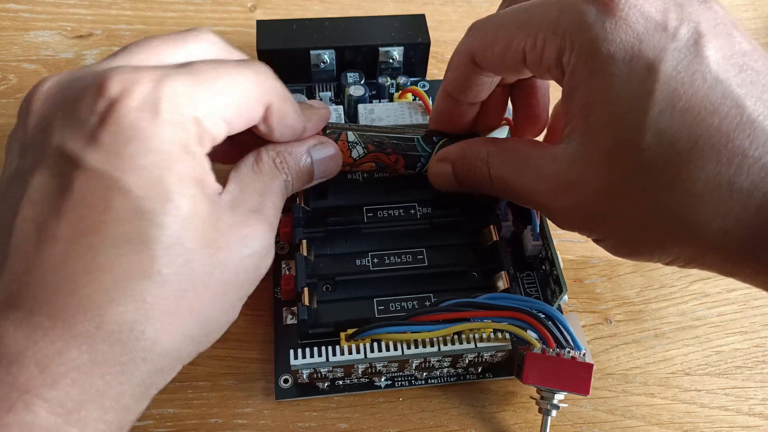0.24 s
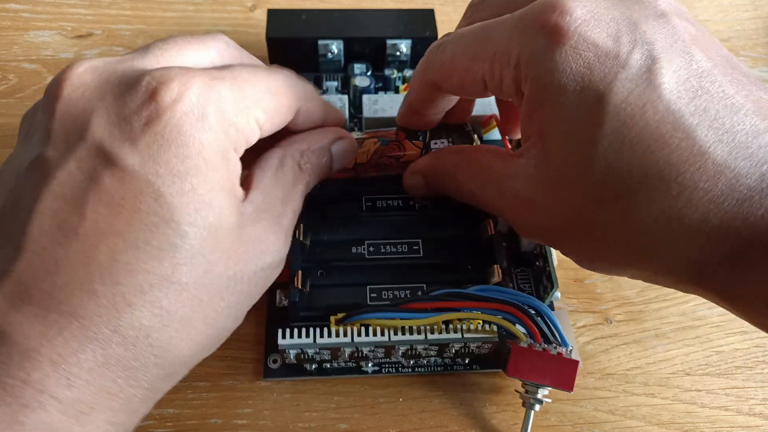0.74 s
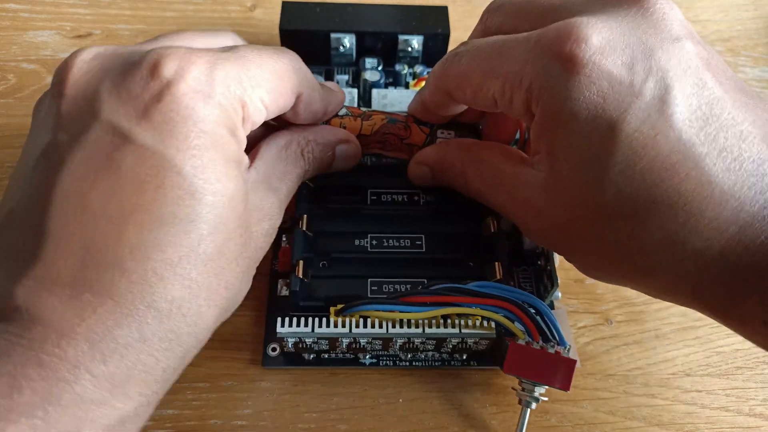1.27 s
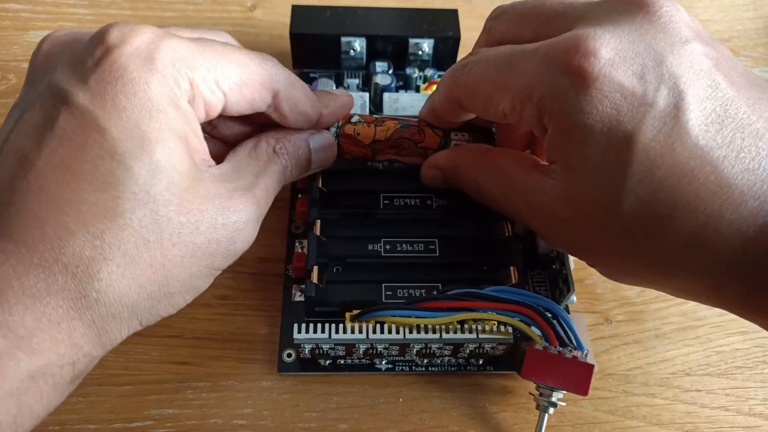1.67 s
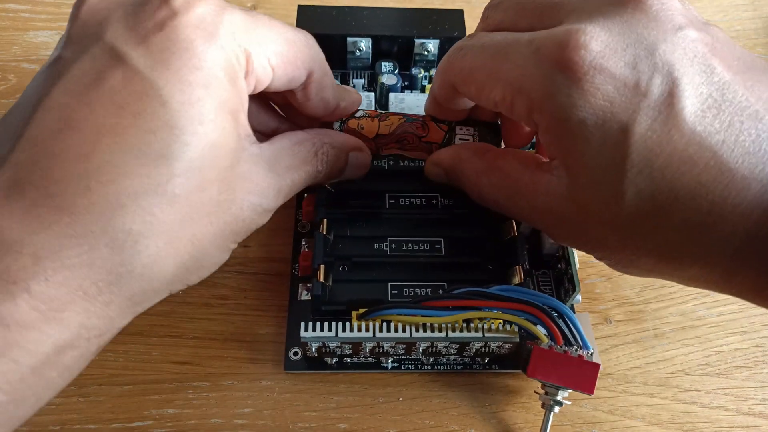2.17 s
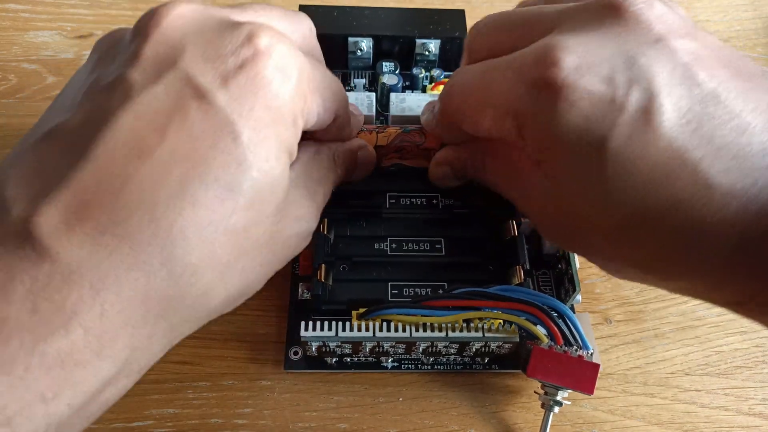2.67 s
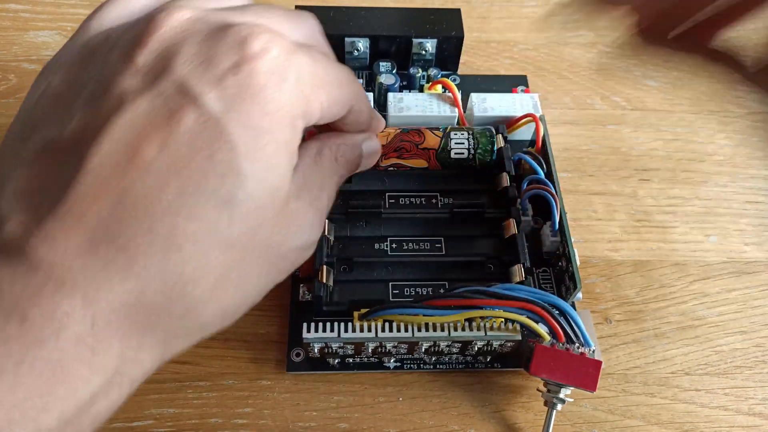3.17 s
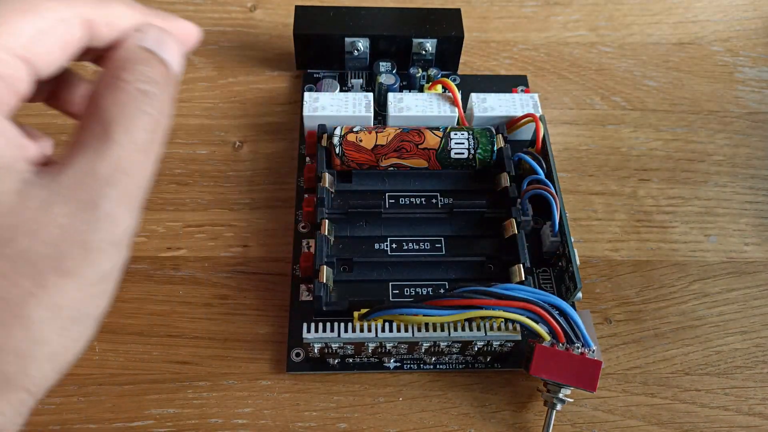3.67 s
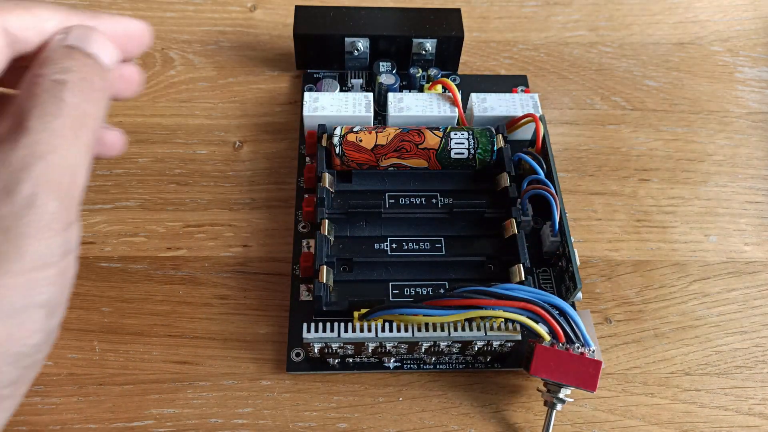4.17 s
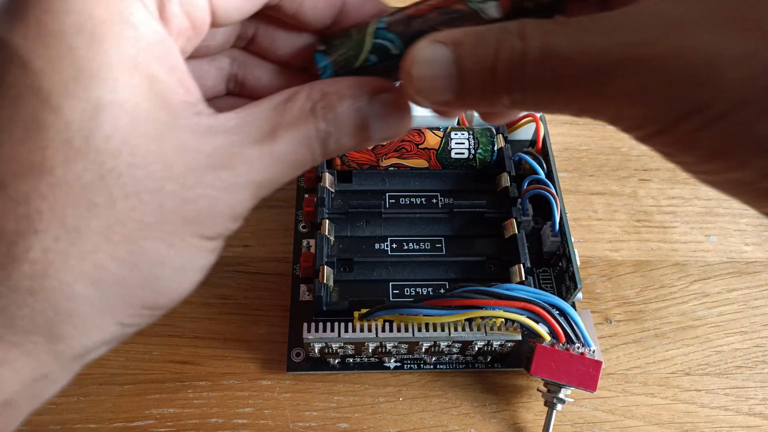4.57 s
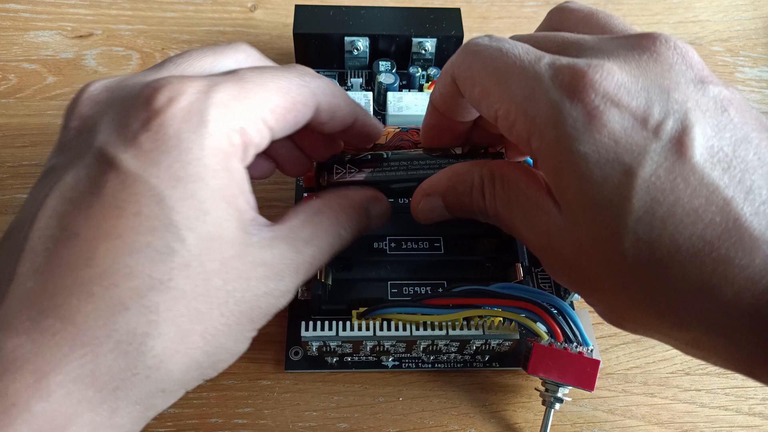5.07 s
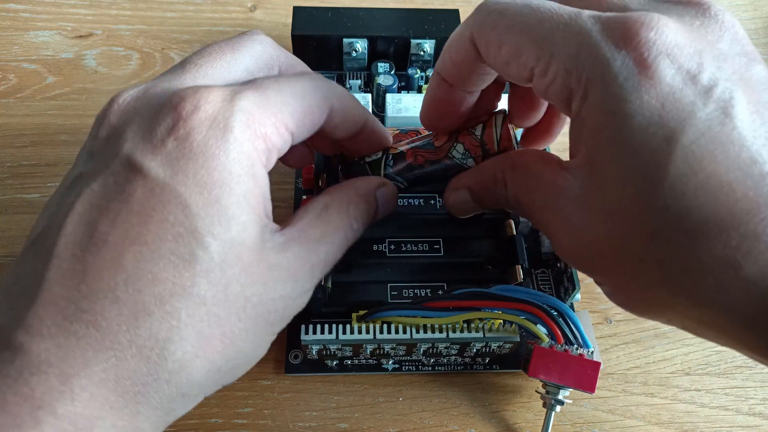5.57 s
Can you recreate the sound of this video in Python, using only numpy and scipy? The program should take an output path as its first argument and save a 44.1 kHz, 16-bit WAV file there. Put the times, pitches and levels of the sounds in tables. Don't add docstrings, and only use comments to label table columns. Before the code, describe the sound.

Close phone pickup of cells being seated in a plastic holder indoors. An initial click with a table thump leads to faint rubbing, dry ticks and soft bumps. Two violent cracks overload the microphone near the middle. Then come sparse bright spring pings, near quiet, a cluster of medium clicks and a last soft push, with little high treble.

```python
import sys
import numpy as np
from scipy import signal
from scipy.fft import rfft, irfft, next_fast_len
from scipy.io import wavfile
from scipy.ndimage import map_coordinates

SR = 44100
rng = np.random.default_rng(int(sys.argv[2]) if len(sys.argv) > 2 else 0)


def to_wav(s):
    ch = np.atleast_2d(s).T
    pcm = np.round(np.clip(ch, -1, 1) * 32767)
    wavfile.write(sys.argv[1], SR, pcm.astype(np.int16))


def ratio_of_db(decibels):
    return 10 ** (np.asarray(decibels, float) / 20)


N = 257103

# f/Hz, width/Hz, level/dB
TABLE_MODES = [(153.2, 14.8, -1), (188.3, 6.7, 3), (231, 24.2, -2), (345, 9.6, -6)]
BOARD_MODES = [(380, 30, -2.5), (424.7, 27, -2), (530, 43, -1.5), (616, 17, -16), (695.5, 72, 3.5),
               (826, 75, -7.5), (877, 33, -10), (1110, 11, 1), (1181, 14, -0.5)]
HOLDER_MODES = [(1340, 2200, -6.5), (2040, 960, -2), (2700, 232, -3), (3200, 170, -4.5), (3596, 395, -6.5),
                (4360, 690, -8.5)]
SPRING_MODES = [(5620, 990, -6), (6388, 503, 5.5), (6364, 707, 7), (7130, 4400, -7.5)]
# t/s, level/dB, deep mode level/dB, favoured f/Hz, ring time factor
CELL_BLOWS = [
    (.275, -9.5, -4.5, 286, 0.51),
    (1.303, -22, -5, 190, 0.54),
    (2.24, -1, -4.5, 223, 0.27),
    (2.621, 4, -16, 189, 0.6),
    (4.108, -24, -10, 268, 0.25),
    (4.608, -23, -4, 210, 0.38),
    (4.615, -23, -10.5, 191.7, 0.41),
    (5.705, -18, -11, 192.8, 1.73),
]


def unit(x):
    return x / np.sqrt(np.mean(x ** 2) + 1e-20)


def along(points, hz):
    f, v = np.transpose(points)
    return np.interp(np.log(hz + 1), np.log(f + 1), v)


def filtered(x, response):
    m = next_fast_len(x.shape[-1] + SR // 8)
    spectrum = rfft(x, m) * response(np.fft.rfftfreq(m, 1 / SR))
    return irfft(spectrum, m)[..., :x.shape[-1]]


def body(modes):
    def response(f):
        total = 0
        for k, (centre, width, db) in enumerate(modes):
            damping = 1j * f * width
            total = total + (-1) ** k * ratio_of_db(db) * damping / (centre * centre - f * f + damping)
        return total
    return response


def lay(track, s, sound):
    track[round(s * SR):][:len(sound)] += sound


def grit(rate, spike_db):
    slips_now = rng.random(N) < rate / SR
    return slips_now * ratio_of_db(spike_db * rng.exponential(size=N)) * rng.standard_normal(N)


def room_tone():
    # f/Hz, level/dB per Hz
    air_shape = [(180, -46), (300, 0.5), (400, -9), (557, -4), (764, -9), (852, -7), (1420, -14.5),
                 (2780, -12.5), (3560, -15), (4880, -23.5), (5910, -20.5), (8000, -28), (10400, -62),
                 (17600, -120)]
    # f/Hz, level/dB per Hz
    rumble_shape = [(15, -43.5), (30, -2), (60, 0.5), (130, -1), (160, -19), (260, -5), (310, -44.5)]
    # f/Hz, level/dB rms
    machines = [(90, -56.5), (96, -54), (119, -69), (220.7, -65)]
    air, rumble = [unit(filtered(rng.standard_normal(N), lambda hz: ratio_of_db(along(shape, hz))))
                   for shape in (air_shape, rumble_shape)]
    t = np.arange(N) / SR - 3.835
    sway = map_coordinates(rng.standard_normal(40), [np.arange(N) / N * 30])
    hum = sum(np.sqrt(2) * ratio_of_db(db + 1.8 * sway) * np.cos(2 * np.pi * hz * t) for hz, db in machines)
    return ratio_of_db(-56) * air + ratio_of_db(-54) * rumble + hum


def shake(db, t60):
    t = np.arange(N) / SR
    return sum(ratio_of_db(db + blow_db - 60 * (t - s).clip(0) / t60) * (t > s) for s, blow_db, *_ in CELL_BLOWS)


def hands():
    # t/s, sliding level/dB, pressure level/dB
    hand_motion = [(0, -57, -41.5), (0.163, -43, -50.5), (.39, -44.5, -32.5), (.52, -51.5, -44.5),
                   (.9, -56.5, -49), (1.33, -51.5, -42.5), (1.5, -61, -43.5), (2.1, -57, -51.5),
                   (2.419, -49.5, -45), (2.58, -59.5, -50), (2.94, -66, -79), (3.26, -53.5, -57),
                   (3.52, -70, -63.5), (4.3, -56, -72.5), (4.82, -65, -49), (5.081, -48.5, -49.5),
                   (5.25, -75, -62.5), (5.751, -55.5, -51.5)]
    # level/dB under the blow, t60/s
    rattles = [
        (-46, .55),
        (-45.5, 0.45),
        (-34, 0.3),
        (-19, 0.17),
    ]
    s, *columns = np.transpose(hand_motion)
    slide_db, press_db = [np.interp(np.arange(N) / SR, s, column) for column in columns]
    creak_db = 0.46 * slide_db + 0.54 * press_db - 3
    drives = slide_db, slide_db - 13, creak_db, press_db
    rub, hiss, creak, tremor = [ratio_of_db(db) + shake(*after) for db, after in zip(drives, rattles)]

    slide = grit(rate=6000, spike_db=2.0)
    creaking = grit(rate=2700, spike_db=2.5)
    trembling = grit(rate=920, spike_db=0.5)
    out = unit(filtered(slide, body(HOLDER_MODES))) * rub
    out += unit(filtered(slide, body(SPRING_MODES))) * hiss
    out += unit(filtered(creaking, lambda f: body(BOARD_MODES)(f) / f.clip(400))) * creak
    return out + unit(filtered(trembling, lambda f: body(TABLE_MODES)(f) ** 2)) * tremor


def scrapes():
    # start t/s, length/s, level/dB, centre f/Hz, brightness/dB
    short_slides = [(0.26, 0.032, -27, 1480, -16), (0.336, 0.19, -43.5, 3240, -36),
                    (0.509, 0.088, -47, 2300, -26), (0.678, 0.035, -49, 2950, -18),
                    (0.738, 0.1, -48, 3200, -14), (0.922, 0.025, -50, 2980, -7),
                    (1.163, 0.11, -44.5, 3300, -17), (1.37, 0.18, -55, 2700, -25),
                    (1.547, 0.028, -48.5, 2260, -15), (1.66, 0.095, -50.5, 2280, -19),
                    (1.853, 0.12, -55.5, 2650, -19), (2.507, 0.05, -44.5, 2700, -10),
                    (3.132, 0.096, -55, 3700, -1), (3.28, 0.097, -49, 3830, -25),
                    (3.522, 0.063, -55, 2980, -4), (4.154, 0.28, -54.5, 3770, -1.5),
                    (4.709, 0.1, -47.5, 2700, -11), (4.982, 0.15, -53.5, 2900, -16),
                    (5.087, 0.034, -35.5, 3200, -22.5), (0, 0.11, -50.5, 1900, -7),
                    (5.469, 0.19, -57.5, 2700, -17), (5.648, 0.051, -45, 2600, -21),
                    (5.71, 0.064, -48, 3200, -29), (4.312, 0.4, -65.5, 4300, 3)]
    out, slide = np.zeros(N), grit(rate=7000, spike_db=1.5)
    for s, length, db, hz, bright_db in short_slides:
        piece = slide[round(s * SR):][:round(length * SR)]
        swell = np.sin(np.pi * np.linspace(0, 1, len(piece)) ** 0.69) ** 4
        spot = body([(hz, 0.5 * hz, 0)])
        dull = unit(filtered(piece, lambda f: body(HOLDER_MODES)(f) * spot(f)))
        bright = unit(filtered(piece, body(SPRING_MODES)))
        lay(out, s, ratio_of_db(db) * swell * (dull + ratio_of_db(bright_db) * bright))
    return out


def singing():
    # start t/s, length/s, level/dB, f/Hz
    squeaks = [(0, 0.14, -52.5, 2000), (.335, 0.043, -54, 2650), (0.36, 0.085, -46, 3600),
               (0.392, 0.074, -48.5, 2660), (1.172, 0.074, -44, 2800), (1.189, .045, -40.5, 1955),
               (1.175, 0.066, -53, 5770), (1.309, .05, -51.5, 2740), (1.39, 0.075, -54, 2700),
               (2.397, 0.052, -46.5, 2700), (3.138, 0.033, -44, 3880), (3.137, .03, -50.5, 5900),
               (3.166, 0.038, -52, 6000), (3.169, .03, -52, 7000), (3.155, 0.055, -58, 2500),
               (5.66, 0.041, -48, 2700), (5.714, .04, -47, 2700), (1.885, .09, -38, 190),
               (1.985, .05, -40, 190), (5.735, .065, -33, 190), (2.64, .04, -19, 190),
               (2.76, .04, -40, 190), (1.935, .03, -49, 550), (2.155, .045, -43, 550),
               (2.14, .05, -50, 720), (3.83, .065, -59, 2400), (3.83, .065, -66, 4000),
               (4.04, .07, -65, 3700), (4.63, .05, -50, 6200), (4.725, .05, -57, 6800),
               (4.73, .04, -51, 2600), (4.75, .03, -53, 4300), (5.176, .035, -59, 7200),
               (5.72, .035, -54, 4300), (2.48, .07, -48, 680)]
    # t/s, level/dB, f/Hz, t60/s
    buzzes = [
        (2.25, -24, 2600, 0.32),
        (2.25, -30, 1205, 0.22),
        (2.25, -33, 1970, 0.3),
        (2.63, -30.5, 1735, .3),
        (2.63, -32, 3810, 0.36),
        (2.63, -32, 3000, 0.23),
        (2.63, -27.5, 889, 0.28),
        (3.305, -48, 5980, .15),
        (3.305, -47, 3560, 0.21),
    ]
    out, slide, t = np.zeros(N + SR), grit(rate=4400, spike_db=3.0), np.arange(SR // 3) / SR
    shapes = [(s, hz, ratio_of_db(db) * np.sin(np.pi * (t / length).clip(0, 1)) ** 1.4)
              for s, length, db, hz in squeaks]
    shapes += [(s, hz, ratio_of_db(db - 60 * t / t60) * (1 - np.exp(-t / .004))) for s, db, hz, t60 in buzzes]
    for s, hz, shape in shapes:
        piece = slide[rng.integers(N - len(t)):][:len(t)]
        part = body([(hz, 0.09 * hz, 0)])
        lay(out, s, shape * unit(filtered(piece, lambda f: part(f) ** 2)))
    return out[:N]


def ringing():
    # start t/s, length/s, peak level/dB, f/Hz
    rocking_notes = [(2.715, .085, -23, 195), (2.255, .085, -19, 240), (2.3, .06, -37, 545),
                     (2.37, .035, -29, 230), (2.42, .055, -30, 190), (2.68, .06, -29, 420),
                     (2.73, .06, -35, 590), (2.64, .035, -19, 275), (.272, .026, -14, 135),
                     (.352, .055, -27, 215), (.4, .07, -33, 185), (.4, .045, -40, 730),
                     (.255, .035, -35, 1280), (.188, .028, -41, 1150), (.445, .025, -42, 650),
                     (1.9, .045, -30, 190), (5.71, .025, -32, 370), (5.742, .02, -30, 380),
                     (5.785, .035, -43, 650), (5.668, .035, -48, 2750), (.018, .035, -50, 1950),
                     (4.715, .045, -52, 2700), (4.755, .022, -53, 2050), (3.787, .018, -50, 600),
                     (3.74, .018, -50, 600), (1.268, .035, -37, 190), (2.175, .025, -40, 540),
                     (1.755, .03, -38, 140), (4.617, .024, -18.5, 190), (4.732, .045, -37, 215),
                     (4.672, .018, -38, 1400), (4.963, .025, -46, 350), (5.05, .022, -46, 350),
                     (5.107, .028, -46, 490), (2.621, .025, -15, 300), (2.24, .022, -19, 1500),
                     (1.028, .018, -42, 600)]
    out, t = np.zeros(N + SR), np.arange(SR // 8) / SR
    for s, length, db, hz in rocking_notes:
        swell = np.sin(np.pi * (t / length).clip(0, 1) ** 0.6)
        drift = np.cumsum(rng.standard_normal(len(t)))
        phase = 2 * np.pi * hz * t + 0.03 * np.sqrt(hz / 1000) * drift
        lay(out, s, ratio_of_db(db) * swell * np.sin(phase))
    return out[:N]


def clicks(rows):
    dull, bright, notes = np.zeros((3, N + SR))
    t = np.arange(SR // 8) / SR
    for s, db, hz, t60, note_db, bright_db in rows:
        t60 = max(t60, .003)
        fade = ratio_of_db(db - 60 * t / t60) * (1 - np.exp(-t / (0.094 * t60)))
        crack, spark, drift = rng.standard_normal((3, len(t)))
        near = signal.lfilter(*signal.iirpeak(min(hz, 4200), 1.3, SR), crack)
        note = np.sin(2 * np.pi * hz * t + 0.051 * np.cumsum(drift))
        lay(dull, s, fade * (near + 0.33 * crack))
        lay(bright, s, ratio_of_db(bright_db) * fade * spark)
        lay(notes, s, ratio_of_db(note_db + 22 * t / t60) * fade * note)
    cracks = ratio_of_db(14.5) * filtered(dull, body(HOLDER_MODES)) + ratio_of_db(14) * filtered(bright, body(SPRING_MODES))
    return cracks[:N], notes[:N]


def slips():
    # t/s, peak level/dB, f/Hz
    spring_slips = [(.4775, -30, 2690), (.54, -43, 1600), (1.177, -37, 2000), (1.199, -38, 2920),
                    (1.2262, -37, 4400), (1.237, -42, 3500), (2.6205, -6, 3260), (2.632, -15, 2910),
                    (3.237, -43, 2520), (3.274, -41, 2630), (3.293, -44, 6060), (3.315, -37, 3580),
                    (3.316, -37, 2090), (3.324, -41, 3600), (3.337, -38, 3600), (5.665, -38, 3710),
                    (5.79, -43, 2700), (5.789, -46, 4220), (.175, -38, 2500), (3.3015, -25, 4500),
                    (3.302, -26, 3450), (4.111, -40, 1400), (4.574, -47, 6100), (4.643, -24, 3700),
                    (4.798, -53, 7300), (5.066, -40, 3700), (5.105, -26, 2750), (5.104, -31, 4000),
                    (5.1725, -39, 6700), (4.928, -45, 2800)]
    t60, note_db, bright_db = 0.015, 2, -13.5
    return sum(clicks([(*row, t60, note_db, bright_db) for row in spring_slips]))


def sparks():
    # t/s, peak level/dB, leaning f/Hz
    contacts = [(1.2265, -27, 3400), (1.237, -30, 3200), (1.251, -38, 3300), (1.3035, -27, 2000),
                (1.358, -30, 3600), (1.3815, -33, 1600), (1.209, -36, 1400), (.178, -40, 1500),
                (.199, -36, 1500), (.2905, -27, 4200), (2.2385, -6, 1550), (2.6213, -2, 3800),
                (4.798, -48, 4100), (4.765, -46, 4200), (4.898, -44, 3700), (4.953, -50, 4100),
                (4.844, -50, 2300), (5.1725, -36, 4200), (5.6655, -40, 4200), (4.1095, -40, 1100),
                (1.27, -44, 3000), (4.6395, -21, 3800), (4.6475, -25, 3700), (4.6535, -25, 4000),
                (4.619, -32, 3500), (.898, -42, 3900), (1.055, -45, 3200), (1.082, -44, 2650),
                (.885, -42, 2200), (.419, -38, 3800)]
    out, t = np.zeros(N + SR), np.arange(SR // 50) / SR
    for s, db, hz in contacts:
        burst = ratio_of_db(-60 * t / .005) * rng.standard_normal(len(t))
        spot = body([(hz, 0.3 * hz, 0)])
        tick = filtered(burst, lambda f: spot(f) * (.4 + body(HOLDER_MODES)(f))
                        + ratio_of_db(-28) * body(SPRING_MODES)(f))
        lay(out, s, ratio_of_db(db) * tick / np.max(np.abs(tick)))
    return out[:N]


def click_rows():
    # t/s, peak level/dB, own ring f/Hz
    dry_ticks = [(0.1922, -26, 3900), (0.477, -23.5, 1210), (0.7184, -38.5, 1620), (0.8747, -31.5, 3200),
                 (.8977, -39, 2760), (0.915, -35.5, 1920), (1.2257, -26, 1970), (1.2504, -34, 2070),
                 (1.3049, -20, 1160), (1.381, -30, 3350), (1.544, -41, 1110), (1.671, -40, 1110),
                 (1.705, -37, 1990), (2.034, -37, 2610), (2.142, -34, 1130), (2.2085, -42, 2594),
                 (4.655, -16, 1206), (4.8953, -37, 2780), (5.063, -40.5, 2300), (5.657, -33, 2050),
                 (5.7027, -26, 3380), (5.767, -32, 2850), (5.729, -39, 2580)]
    # t/s, peak level/dB, own ring f/Hz, t60/s, ring share/dB
    clip_snaps = [(0.2759, -7.5, 2590, 0.03, -15), (0.278, -13.5, 2540, 0.021, -26),
                  (2.2326, -17, 4900, .045, 0.5), (2.2377, 3.5, 2580, 0.022, -8.5),
                  (2.2433, -8, 2050, 0.03, -4.5), (2.2501, -10, 2700, .023, -2),
                  (2.6145, -18.5, 3050, .024, 0), (2.6207, 2, 1652, .026, -5.5),
                  (2.6352, -17.5, 1790, 0.02, 6), (3.3022, -22.5, 6010, 0.0088, 8.5),
                  (4.6085, -30, 2780, 0.0079, 9)]
    # t/s, peak level/dB, f/Hz, t60/s, brightness/dB
    part_pings = [(0.798, -35, 3070, 0.012, -22), (.8435, -43, 2600, 0.0099, -26),
                  (0.9583, -44, 3100, .015, -23), (1.2357, -31, 1940, 0.017, -21),
                  (1.3583, -34, 2800, 0.01, -9), (4.1095, -34.5, 2530, 0.018, -36),
                  (4.6085, -31, 2770, 0.04, -14), (4.6348, -23, 2710, 0.045, -17),
                  (4.8095, -40, 3780, 0.012, -18), (4.963, -40, 1130, 0.035, -25),
                  (5.1, -25, 2706, 0.018, -14), (5.172, -36, 7600, 0.009, 5),
                  (5.196, -33.5, 1170, .016, -32), (5.4725, -48, 3780, 0.017, -27),
                  (5.788, -35.5, 2080, 0.032, -20)]
    # t/s, peak level/dB, f/Hz
    spring_flicks = [
        (3.1395, -39, 3680),
        (3.1632, -27.5, 6000),
        (3.261, -29, 2420),
        (3.533, -44, 2700),
        (3.806, -33, 4280),
        (3.8134, -22.5, 3860),
        (4.489, -43, 2410),
        (4.5724, -37, 4060),
    ]
    spring_twangs = [
        (2.251, -19, 2700, 0.051),
        (2.6212, -4, 3887, 0.011),
        (2.6366, -10.5, 3670, 0.014),
        (3.3013, -24, 4030, 0.008),
        (4.6086, -26, 3700, 0.0086),
        (4.6321, -15.5, 3780, 0.02),
    ]
    return ([(*row, 0.022, -3.5, -19.5) for row in dry_ticks]
            + [(*row, -10) for row in clip_snaps]
            + [(*row, 3.5, bright_db) for *row, bright_db in part_pings]
            + [(*row, 0.01, -4, -9) for row in spring_flicks]
            + [(*row, -.1, -21) for row in spring_twangs])


def knock_rows():
    # t/s, level/dB, favoured f/Hz
    finger_presses = [(0.193, -19, 197.7), (.476, -33.5, 208), (0.678, -36, 186), (0.723, -33, 169),
                      (.768, -35, 174), (.911, -30.5, 182), (1.015, -30.5, 166), (1.386, -34.5, 189),
                      (1.441, -27, 175), (1.544, -30.5, 180), (1.67, -28.5, 180), (1.796, -29.5, 156),
                      (1.839, -29.5, 159), (1.863, -29, 172), (2.03, -36, 191), (1.891, -27, 178),
                      (1.937, -33, 190), (1.988, -25.5, 178), (2.077, -25.5, 162), (2.114, -33, 179),
                      (2.139, -23, 140.5), (2.206, -21.5, 183), (3.303, -32.5, 218), (3.746, -45.5, 233),
                      (4.633, -22.5, 231), (4.73, -40, 194), (5.329, -43.5, 193), (5.053, -36.5, 201)]
    # t/s, level/dB, favoured f/Hz, ring time factor
    board_slaps = [(0.264, -17, 186, 0.39), (.283, -5, 147, 0.23), (0.308, -13.5, 183, 0.41),
                   (0.363, -24, 199, 0.98), (1.332, -27.5, 183, 0.73), (2.164, -19.5, 168, 0.4),
                   (2.232, -7.5, 159, 0.34), (2.274, -8.5, 251.6, .67), (2.684, -6.5, 196.4, 0.98),
                   (2.401, -22.5, 191, 0.75), (2.746, -26, 194, 0.86), (3.259, -26, 216.3, .97),
                   (4.484, -41.5, 261, 0.62), (4.655, -16.5, 152, 0.37), (4.679, -22.5, 206, 0.61),
                   (5.456, -36, 193, 1.01), (5.789, -23.5, 203, 0.44)]
    # t/s, level/dB
    palm_thuds = [
        (1.116, -37.5),
        (3.143, -40.5),
        (4.125, -47.5),
        (4.961, -40.5),
        (5.112, -42),
        (5.584, -47.5),
    ]
    soft_s, hard_s = .0025, .00088
    return ([(s, db, -8, hz, 0.87, soft_s) for s, db, hz in finger_presses]
            + [(*row, hard_s) for row in CELL_BLOWS]
            + [(s, db, -24.5, hz, factor, hard_s) for s, db, hz, factor in board_slaps]
            + [(s, db, 6, 175, 0.6, soft_s) for s, db in palm_thuds])


def ring(modes, t, stretch, attack, near_hz=None):
    if near_hz:
        modes = [(hz, width, .5 * db - 30 * abs(np.log2(hz / near_hz))) for hz, width, db in modes]
        modes = modes + [(near_hz, 0.056 * near_hz, -1)]
    hz, width, db = np.transpose(modes)[:, :, None]
    strength, phase = rng.standard_normal((2, len(modes), 1))
    fade = np.exp(-np.pi * width * t / max(stretch, .1)) * (1 - np.exp(-t / attack))
    x = np.sum(ratio_of_db(db + 1.5 * strength) * np.sin(2 * np.pi * hz * t + .9 * phase) * fade, axis=0)
    return x / np.max(np.abs(x))


def knocks():
    # f/Hz, width/Hz, level/dB
    deep_modes = [(70, 48, -25.5), (96.8, 18.7, 7), (136.8, 8.7, -12)]
    # t/s, peak level/dB, favoured f/Hz, ring time factor
    board_taps = [(.196, -26, 760, 1.5), (.275, -14.5, 530, 0.39), (.283, -12, 727, 0.44),
                  (0.478, -28.5, 476, 0.81), (.719, -39, 650, .44), (.916, -27, 702, 0.81),
                  (1.017, -28.5, 495, 0.25), (1.304, -23, 705, 0.92), (1.385, -27, 608, .65),
                  (1.547, -26, 667, .6), (1.671, -31, 515, 0.46), (1.708, -32, 630, 0.61),
                  (2.141, -31, 560, .66), (2.207, -29, 530, 0.69), (2.239, -4, 515, 0.66),
                  (2.245, -1, 716, 0.39), (2.272, -13.5, 530, .6), (2.523, -40, 670, .74),
                  (2.62, 5, 539, 0.45), (2.631, -8, 448, 0.56), (2.659, -20, 443, .6),
                  (3.263, -38.5, 413, 0.73), (4.109, -25, 506, 0.44), (4.49, -36, 475, 0.34),
                  (4.608, -36, 380, 0.42), (4.632, -20, 391, 0.51), (4.656, -15, 715, 0.75),
                  (5.053, -31.5, 676, 1.01), (5.112, -27.5, 680, 0.93), (5.703, -25.5, 465, 0.7)]
    grips = [0.336, 1.317, 1.347, 2.79, 5.8]  # s, a firm hand stills the table
    grip_db_per_s = 901
    table, board, t = np.zeros(N + SR), np.zeros(N + SR), np.arange(SR // 3) / SR
    for s, db, deep_db, hz, stretch, attack in knock_rows():
        blow = ring(TABLE_MODES, t, 1.08 * stretch, attack, hz)
        blow = blow + ratio_of_db(deep_db + 2.5) * ring(deep_modes, t, stretch, 0.012)
        held = sum((t + s - grip).clip(0) for grip in grips if grip > s)
        lay(table, s + .001, ratio_of_db(db) * blow * ratio_of_db(-grip_db_per_s * held))
    for s, db, hz, stretch in board_taps:
        lay(board, s + .0012, ratio_of_db(db) * ring(BOARD_MODES, t, 1.63 * stretch, 0.00011, hz))
    return table[:N], board[:N]


def walls(x):
    # f/Hz, t60/s
    room_decay = [(100, 0.39), (500, 0.34), (2000, 0.35), (8000, 0.33)]
    hz, t, z = signal.stft(rng.standard_normal(SR // 2), SR, nperseg=256)
    dying = z * ratio_of_db(-60 * t / along(room_decay, hz)[:, None])
    tail = signal.istft(dying, SR, nperseg=256)[1]
    return signal.fftconvolve(np.pad(x, (200, 0)), tail / np.linalg.norm(tail))[:N]


def scene():
    table, board = knocks()
    cracks, notes = clicks(click_rows())
    slides = scrapes()
    echo = walls(ratio_of_db(-14) * table + ratio_of_db(-10) * board + ratio_of_db(-11) * (cracks + slides) + ratio_of_db(-24) * notes)
    out = room_tone() + hands() + slides + singing() + ringing() + slips() + sparks()
    out += cracks + notes + table + board + echo
    return out[None]


def roll_off(x):
    return signal.sosfilt(signal.butter(12, 16520, fs=SR, output="sos"), x)


def record(dry):
    # f/Hz, level/dB
    phone_band = [(7700, -0.5), (8200, -12), (8700, -58), (20000, -110)]
    narrow = filtered(dry, lambda hz: ratio_of_db(along(phone_band, hz)) * (1j * hz / (56 + 1j * hz)) ** 2)
    overloaded = np.clip(narrow, -.98, .98)
    loud = filtered(overloaded, lambda hz: np.clip((16500 - hz) / 200, 0, 1) ** 2)
    hiss = ratio_of_db(-78.5) * filtered(rng.standard_normal(dry.shape), lambda hz: hz < 15100)
    return roll_off(loud + hiss)


dry = scene()
out = record(dry)
to_wav(out)
```